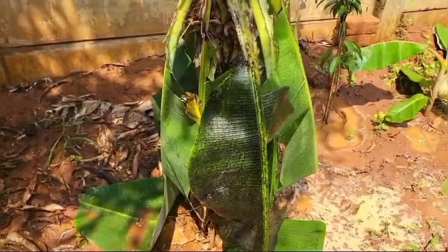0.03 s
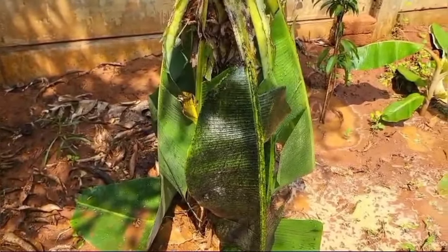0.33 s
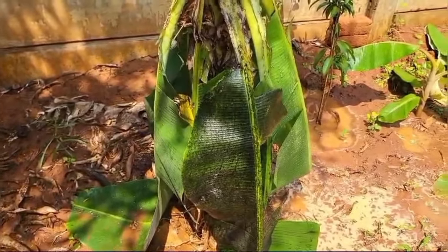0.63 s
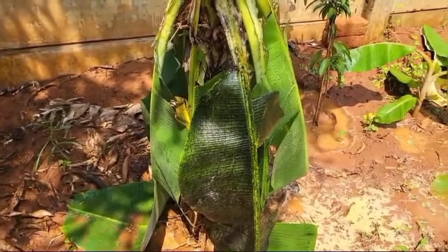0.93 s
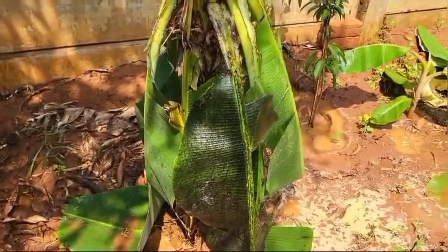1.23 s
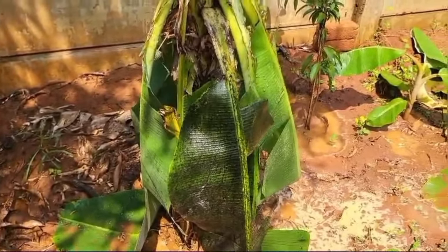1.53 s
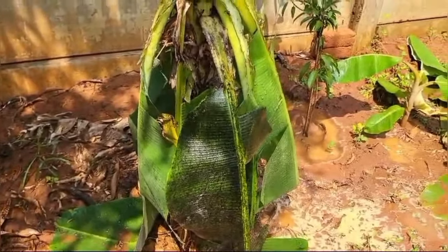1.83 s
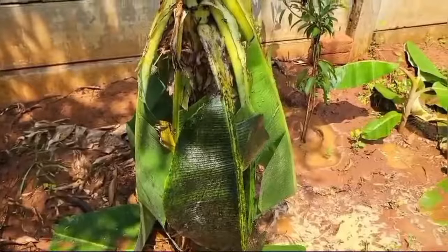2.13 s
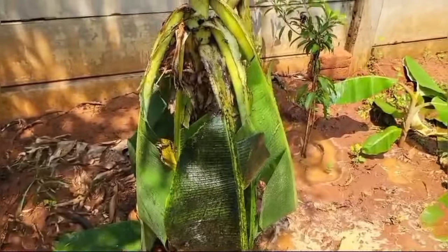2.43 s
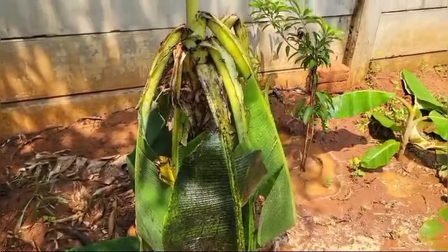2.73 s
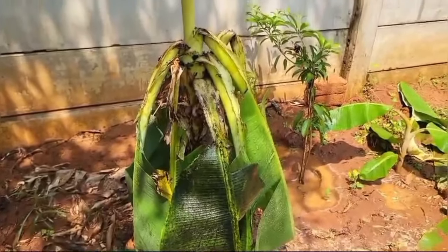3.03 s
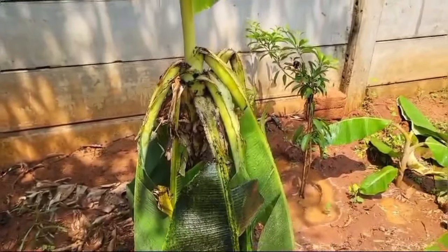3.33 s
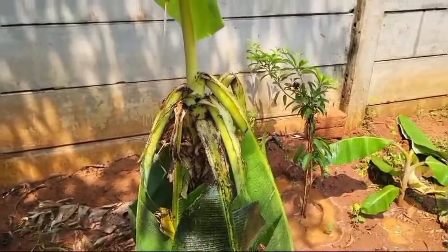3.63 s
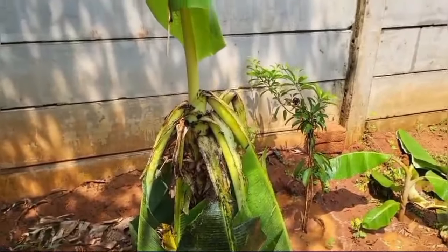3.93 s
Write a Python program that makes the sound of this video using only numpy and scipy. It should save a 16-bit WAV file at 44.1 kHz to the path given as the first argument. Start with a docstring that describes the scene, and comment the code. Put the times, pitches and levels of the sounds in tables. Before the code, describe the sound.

Foliage hisses steadily in a breeze in a walled garden. From about halfway, broad banana leaves beside the microphone flutter, rustle and drum softly, with one flap near the end, over a hollow rush of air and low rumble.

```python
"""Foliage hissing in the moving air of a walled garden, the microphone beside a banana plant.
Close by, its broad leaves flutter with a low drumming, rustle, thrum, flap and brush each other.
A hollow rush of air swells and drifts in pitch; low buffeting, eddies and a rumble lie underneath.
A near wall returns the low sounds and gives them a ribbed, pipe-like colour."""
import sys
import numpy as np
from scipy import signal
from scipy.fft import rfft, irfft, next_fast_len
from scipy.io import wavfile
from scipy.ndimage import uniform_filter1d, map_coordinates

SR = 44100
rng = np.random.default_rng(int(sys.argv[2]) if len(sys.argv) > 2 else 0)


def generate_wav(signal):
    """Clip the signal to [-1, 1] and save it as 16-bit WAV at the path in sys.argv[1]."""
    frames = np.transpose(np.atleast_2d(signal))
    scaled = np.clip(frames, -1, 1) * 32767
    pcm = np.round(scaled).astype(np.int16)
    wavfile.write(sys.argv[1], SR, pcm)


N = 176400

# How each layer swells and sinks. Each row: time in seconds, level in dB before the layer's trim.
HISS_LEVEL = [(0, -46), (.29, -48.5), (.33, -45.5), (.38, -48), (.58, -46.5), (.69, -46.5), (.81, -47.5),
              (.88, -42.6), (.99, -43.5), (1.03, -45.3), (1.1, -43.5), (1.22, -45.5), (1.58, -46),
              (1.62, -48.5), (2.26, -50), (2.32, -46), (2.38, -50), (2.57, -51), (2.6, -47), (2.66, -55),
              (2.78, -47.5), (2.82, -52.5), (3.21, -47.5), (3.25, -50.3), (3.49, -49.5), (3.51, -46),
              (3.56, -51.5), (3.61, -47.5), (3.77, -51.5), (3.87, -45.5), (4, -46)]
DRUM_LEVEL = [(0, -48.5), (.11, -55), (.27, -49), (.35, -54.5), (.45, -51), (.66, -58), (.72, -67.5),
              (.84, -53.5), (.92, -61), (1.33, -58), (1.82, -65), (2.08, -50), (2.17, -45), (2.3, -44.5),
              (2.37, -50), (2.5, -45.5), (2.69, -49.5), (2.9, -46), (3.1, -50), (3.42, -50), (3.5, -45.5),
              (3.72, -45.5), (3.84, -50), (4, -54)]
RUSTLE_LEVEL = [(0, -59), (.4, -58.5), (.84, -62.5), (1.2, -66), (1.87, -67.5), (2.02, -50.5), (2.18, -53),
                (2.32, -54), (2.47, -57.5), (2.62, -50.5), (2.68, -58), (2.86, -56), (2.905, -47),
                (2.97, -55.5), (3.3, -60), (3.55, -56.5), (3.72, -49.5), (3.93, -62.5), (4, -59)]
RUSH_LEVEL = [(0, -57.5), (.4, -53), (.62, -52.5), (.85, -56), (1.1, -64.5), (1.4, -57), (1.6, -48.5),
              (1.85, -53), (1.885, -45), (2.04, -48), (2.17, -46.5), (2.35, -53), (2.52, -53.5), (2.6, -54),
              (2.68, -54.5), (2.77, -52), (2.92, -53.5), (3.1, -58), (3.21, -52.5), (3.45, -53.5),
              (3.52, -53.5), (3.7, -53.5), (3.93, -57), (4, -50.5)]
BUFFET_LEVEL = [(0, -60), (.26, -55), (.37, -67.5), (1.3, -58.5), (1.68, -53.5), (1.82, -55.5), (2.14, -51),
                (2.55, -53.5), (2.62, -44.5), (2.7, -55), (2.85, -63), (2.9, -44), (2.96, -45), (3.43, -56),
                (3.51, -41), (3.54, -49), (3.6, -47.5), (3.97, -58.5)]
HISS_TRIM_DB, DRUM_TRIM_DB, RUSTLE_TRIM_DB, RUSH_TRIM_DB, BUFFET_TRIM_DB = 4, -2, 0.5, 2, -3
# Tone colour of each layer. Each row: frequency in Hz, relative level in dB.
HISS_SPECTRUM = [(300, -13), (900, -6.5), (1500, -0.5), (2100, 1.5), (2600, 0.2), (3100, -0.8),
                 (4500, -0.5), (6300, -3.5), (7600, -1.5), (9500, -10.5), (12500, -6), (15500, -7)]
DRUM_SPECTRUM = [(50, -37), (110, -7.5), (155, -8.5), (190, 2), (215, -2.5), (275, -6.5), (315, -10),
                 (370, -8), (500, -13.5), (1000, -49), (3000, -67)]
RUSTLE_SPECTRUM = [(100, -63), (330, -14.5), (550, 2), (850, -1), (1300, -0.5), (2500, -29), (8000, -56)]
BUFFET_SPECTRUM = [(35, -23), (65, -14.5), (100, -2.5), (125, 0), (160, -18), (300, -22), (1000, -66)]
EDDY_SPECTRUM = [(20, -24), (40, -6), (90, -1), (170, 0), (260, -5), (500, -25), (2000, -70)]
RUMBLE_SPECTRUM = [(18, -35), (27, 5), (36, 7.5), (48, 1.5), (62, 6), (80, -8), (105, -4), (150, -7),
                   (300, -28.5), (1000, -34.5)]
# Lower edge of the hiss, lifting as the breeze swells. Each row: time in seconds, edge in Hz.
HISS_LOWER_EDGE = [(0, 1970), (.58, 1910), (.8, 2570), (.92, 2410), (1.22, 2300), (1.35, 2070), (3, 1930),
                   (4, 2270)]
# Pitch of the rush. Each row: time in seconds, band centre in Hz.
RUSH_PITCH = [(0, 1290), (.5, 1320), (.85, 1070), (1.3, 1470), (1.7, 1350), (1.95, 1160), (2.3, 1330),
              (2.9, 1390), (3.25, 1530), (4, 1570)]
# A leaf rings. Each row: time of the peak in seconds, peak level in dB, note in Hz.
LEAF_THRUMS = [(.505, -40.5, 185.3), (2.16, -41.5, 187.8), (2.235, -41, 186.8), (2.815, -36.5, 202.8),
               (3.515, -39, 192), (3.72, -43.5, 197.4)]
# A leaf snaps over. Each row: start in seconds, level in dB.
LEAF_FLAPS = [(3.593, -29)]
# Leaves rub. Each row: time of the peak in seconds, half length in seconds, level in dB, centre in Hz.
LEAF_BRUSHES = [(0.534, 0.019, -48, 1900), (1.31, 0.02, -45, 2400), (1.311, .007, -57, 735),
                (1.893, 0.03, -56, 1240), (2.3, 0.02, -47, 1640), (3.51, .02, -44.5, 1410),
                (3.518, 0.013, -45, 5560)]
# How alike left and right are. Each row: frequency in Hz, correlation (capped at 1 in use).
STEREO_LIKENESS = [(100, 1), (200, 3), (380, 0.75), (620, 0.45), (1200, 0.23), (2400, 0.11),
                   (15000, -0.0262)]
# Balance at the microphone. Each row: frequency in Hz, left minus right in dB.
STEREO_BALANCE = [(100, 0.8), (480, 1.5), (950, -1.5), (1900, -3.5), (7500, -2)]
# Phase at the microphone. Each row: frequency in Hz, lag of the left side in radians.
LEFT_LAG = [(400, 0), (700, 0.38), (1350, 2), (4000, 1.4), (12000, 5)]


def foliage_hiss(below_edge_db=-9.5, edge_octaves=0.12, treble_db_per_db=0.54, treble_hz=7100):
    """Fine foliage: a bright trembling hiss, hollow below a sliding edge, airier in the long swells."""
    level_db = curve(HISS_LEVEL)
    lasting_db = uniform_filter1d(level_db - level_db.mean(), size=int(0.2 * SR))

    def gain(hz, t):
        edge_hz = np.interp(t, *np.transpose(HISS_LOWER_EDGE))
        below_edge = (1 - np.tanh(np.log2(hz / edge_hz) / edge_octaves)) / 2
        swell_db = np.interp(t, np.arange(N) / SR, lasting_db)
        return amp(below_edge_db * below_edge + treble_db_per_db * swell_db * highpass(hz, treble_hz))
    tremble_db = 0.8 * wobble(40)
    hiss = unit(moving_filter(air_noise(HISS_SPECTRUM, patchy_db=1.5), gain))
    return amp(HISS_TRIM_DB + level_db + tremble_db) * hiss


def broad_leaves():
    """Big leaves by the microphone drum in the bass and rustle above it, in quick uneven shivers."""
    drum = unit(air_noise(DRUM_SPECTRUM, patchy_db=0.5) * amp(1.2 * wobble(40)))
    rustle = unit(air_noise(RUSTLE_SPECTRUM, patchy_db=1.5) * amp(0.77 * wobble(60)))
    drum *= amp(DRUM_TRIM_DB + curve(DRUM_LEVEL))
    rustle *= amp(RUSTLE_TRIM_DB + curve(RUSTLE_LEVEL))
    return drum + rustle


def leaf_thrums(half_length_s=0.023):
    """A broad leaf rings for a moment on its lowest note, swelling and dying away."""
    t, out = np.arange(N) / SR, np.zeros(N)
    phase_drift = 0.34 * wobble(40)
    for peak_s, db, hz in LEAF_THRUMS:
        phase = rng.uniform(0, 2 * np.pi) + phase_drift
        out += amp(db) * swell(peak_s, half_length_s) * np.sin(2 * np.pi * hz * t + phase)
    return out


def leaf_flaps(push_hz=129, decay_s=0.0023, tick_db=-9.5):
    """A leaf snaps over: one soft push of air with a papery tick."""
    t, out = np.arange(SR // 20) / SR, np.zeros((2, N))
    push = t / decay_s * np.exp(1 - t / decay_s) * np.cos(2 * np.pi * push_hz * t)
    paper = air_noise([(300, -45), (1400, 19), (6000, -20)], patchy_db=10)
    for start_s, db in LEAF_FLAPS:
        i = round(start_s * SR)
        tick = amp(tick_db) * paper[:, i:i + len(t)] * np.exp(-t / decay_s)
        out[:, i:i + len(t)] += amp(db) * (push + tick)
    return out


def leaf_brushes(width_octaves=0.42):
    """One leaf slides over another: a short swell of narrow, rough noise."""
    out = np.zeros((2, N))
    friction = air_noise([(20, 0), (20000, 0)], patchy_db=-0.5)
    for peak_s, half_length_s, db, centre_hz in LEAF_BRUSHES:
        rub = unit(filtered(friction, lambda hz: band(np.log2((hz + 1) / centre_hz), width_octaves)))
        out += amp(db) * swell(peak_s, half_length_s) * rub
    return out


def hollow_rush(octaves_below=0.29, octaves_above=0.45):
    """A grainy, hollow band of air noise whose centre drifts."""
    def gain(hz, t):
        octaves = np.log2(hz / np.interp(t, *np.transpose(RUSH_PITCH)))
        return band(octaves, np.where(octaves < 0, octaves_below, octaves_above))
    rush = moving_filter(air_noise([(20, 0), (20000, 0)], patchy_db=2.5), gain)
    grain = amp(2.06 * wobble(150))
    return amp(RUSH_TRIM_DB + curve(RUSH_LEVEL)) * unit(rush * grain)


def buffeting():
    """The air buffets in low, uneven bumps."""
    return amp(BUFFET_TRIM_DB + curve(BUFFET_LEVEL)) * air_noise(BUFFET_SPECTRUM, patchy_db=1.5)


def rumble(level_db=-55):
    """A steady, deep rumble under the garden."""
    return amp(level_db) * air_noise(RUMBLE_SPECTRUM, patchy_db=1.5)


def eddies(level_db=-64.5):
    """Faint low eddies, different on each side of the microphone."""
    noise = rng.standard_normal((2, N))
    return amp(level_db) * unit(filtered(noise, lambda hz: amp(along(EDDY_SPECTRUM, hz))))


def near_wall(x, delay_s=0.01065, share=0.68, dull_hz=1420):
    """The wall sends back one late, duller copy, which combs the low sounds."""
    def echo(hz):
        return share / (1 + (hz / dull_hz) ** 2) * np.exp(-2j * np.pi * hz * delay_s)
    return filtered(x, lambda hz: 1 + echo(hz))


def ground_scatter(x, gain_db=-7, decay_s=0.021, low_hz=480, high_hz=4000):
    """Ground and stems add a short spray of midrange echoes, different on each side."""
    t = np.arange(SR // 16) / SR
    tail = rng.standard_normal((2, len(t))) * np.exp(-t / decay_s)
    echoes = signal.fftconvolve(x, tail / np.linalg.norm(tail[0]), axes=1)[:, :N]
    midrange = filtered(echoes, lambda hz: highpass(hz, low_hz) / np.hypot(1, hz / high_hz))
    return x + amp(gain_db) * midrange


def air_noise(spectrum, patchy_db):
    """Stereo noise of rms 1 with patches of random gain; alike in the bass, unrelated in the treble."""
    cells = signal.stft(rng.standard_normal((2, N)), nperseg=256)[2]
    patches = uniform_filter1d(rng.standard_normal(cells.shape[1:]), size=5, axis=0)
    patches = uniform_filter1d(patches, size=4, axis=1)
    pair = signal.istft(cells * amp(patchy_db * unit(patches)), nperseg=256)[1][:, :N]

    def mid_side_gains(hz):
        angle = np.arccos(np.clip(along(STEREO_LIKENESS, hz), -1, 1)) / 2
        return amp(along(spectrum, hz)) * [np.cos(angle), np.sin(angle)]
    mid, side = filtered(pair, mid_side_gains)
    return unit(np.array([mid + side, mid - side]))


def amp(db):
    """Decibels to gain."""
    return 10 ** (np.asarray(db) / 20)


def unit(x):
    """Scale to rms 1."""
    return x / np.sqrt(np.mean(x ** 2) + 1e-20)


def along(rows, hz):
    """Rows of frequency and value, read at hz on a log axis."""
    row_hz, values = np.transpose(rows)
    return np.interp(np.log(hz + 1), np.log(row_hz + 1), values)


def curve(rows):
    """Rows of time and value, as one value per sample."""
    return np.interp(np.arange(N) / SR, *np.transpose(rows))


def swell(peak_s, half_length_s):
    """A bell-shaped rise and fall of height 1."""
    return np.exp(-((np.arange(N) / SR - peak_s) / half_length_s) ** 2 / 2)


def wobble(rate):
    """A smooth random curve, rate knots a second."""
    return map_coordinates(rng.standard_normal(4096), [np.arange(N) * rate / SR], mode="wrap")


def band(octaves, width):
    """Gain of a resonance at a distance in octaves from its centre."""
    return 1 / (1 + (octaves / width) ** 2 / 2) ** 1.28


def highpass(hz, corner_hz):
    """Gain rising from 0 to 1 around the corner."""
    return hz ** 2 / (hz ** 2 + corner_hz ** 2)


def filtered(x, response):
    """x through a still filter; response is a function of Hz."""
    size = next_fast_len(N + SR // 2)
    return irfft(rfft(x, size) * response(np.fft.rfftfreq(size, 1 / SR)), size)[..., :N]


def moving_filter(x, gain):
    """x through a moving filter; gain is a function of Hz and seconds."""
    hz, t, cells = signal.stft(x, SR, nperseg=512)
    return signal.istft(cells * gain(hz[:, None] + 1, t), SR, nperseg=512)[1][:, :N]


def scene():
    """Leaves and air before the wall, over a low rumble; the treble sits a little to the right."""
    breeze = buffeting() + foliage_hiss() + hollow_rush() + leaf_brushes() + broad_leaves()
    garden = ground_scatter(near_wall(breeze)) + leaf_flaps() + leaf_thrums() + eddies() + rumble()
    sides = np.array([[0.5], [-0.5]])  # left, right

    def placement(hz):
        return amp(sides * along(STEREO_BALANCE, hz)) * np.exp(-1j * sides * along(LEFT_LAG, hz))
    return filtered(garden, placement)


def record(dry):
    """The microphone has a narrow notch in the treble and a steep upper limit."""
    notch_hz, width_hz, notch_db, top_hz = 8470, 414, -16.5, 15880
    notched = filtered(dry, lambda hz: amp(notch_db * np.exp(-((hz - notch_hz) / width_hz) ** 2)))
    return filtered(notched, lambda hz: hz < top_hz)


dry = scene()
out = record(dry)
generate_wav(out)
```